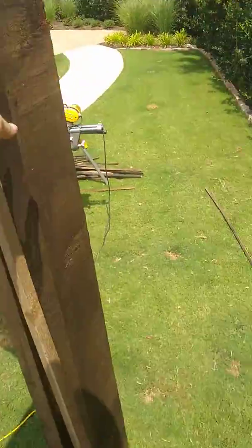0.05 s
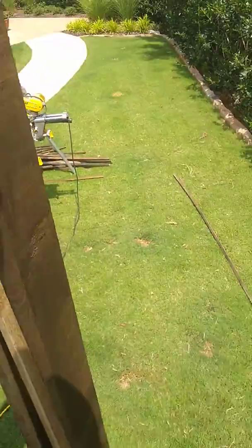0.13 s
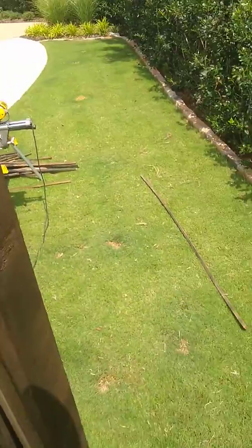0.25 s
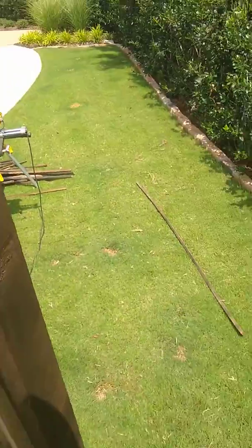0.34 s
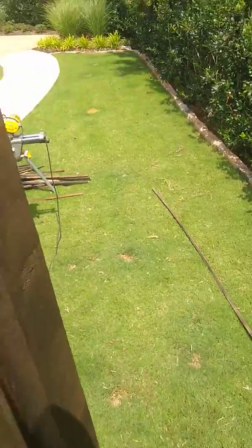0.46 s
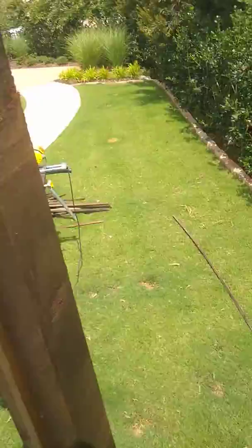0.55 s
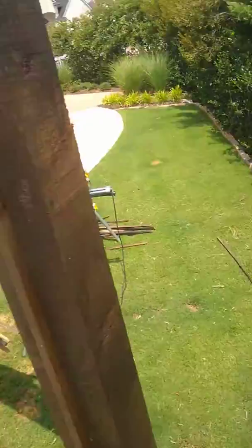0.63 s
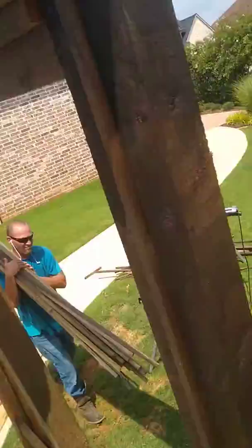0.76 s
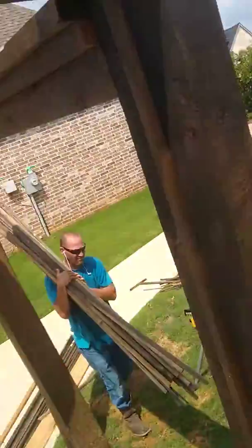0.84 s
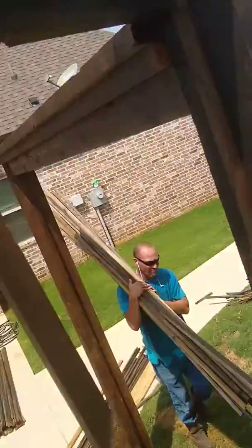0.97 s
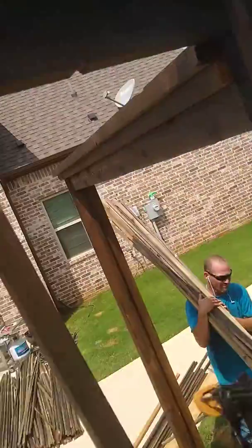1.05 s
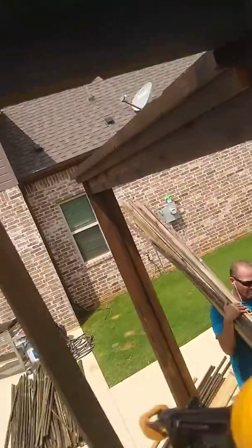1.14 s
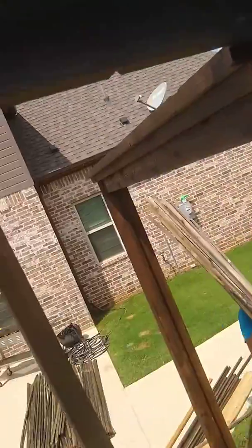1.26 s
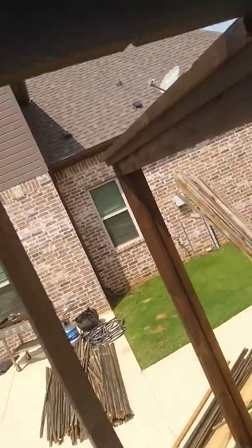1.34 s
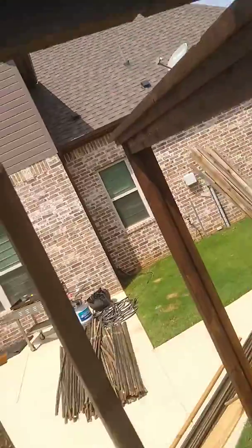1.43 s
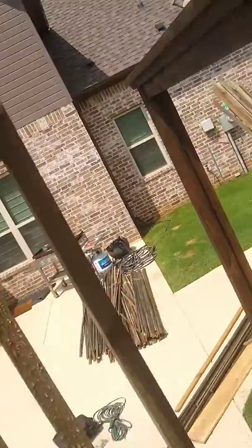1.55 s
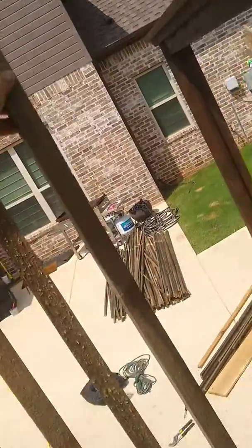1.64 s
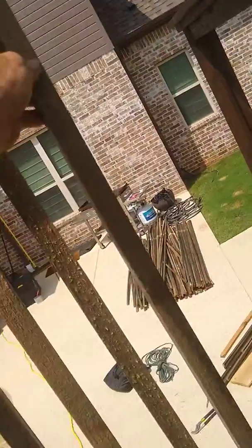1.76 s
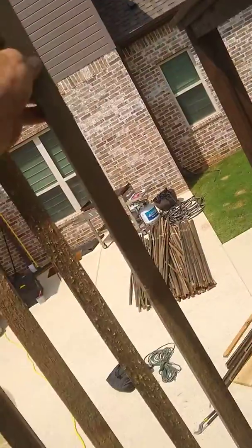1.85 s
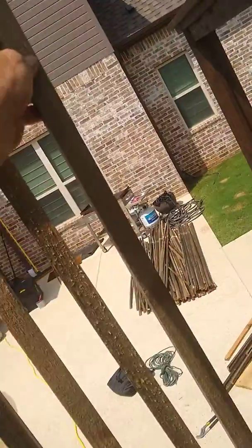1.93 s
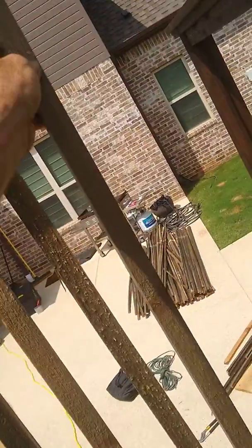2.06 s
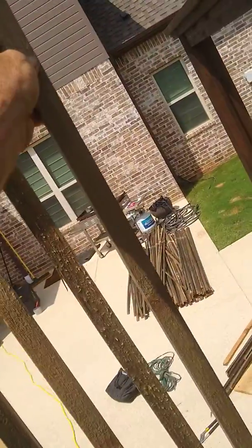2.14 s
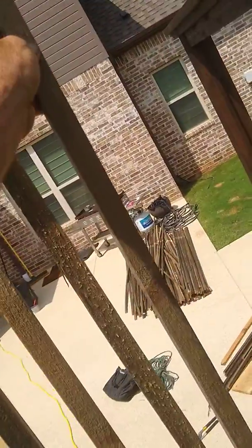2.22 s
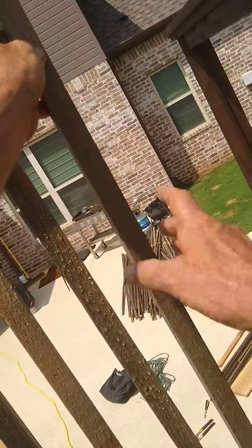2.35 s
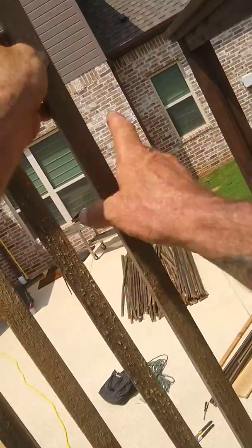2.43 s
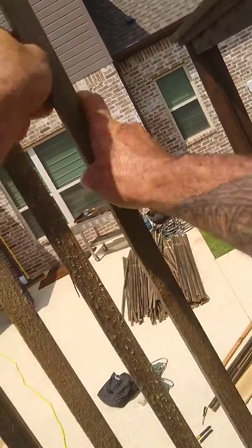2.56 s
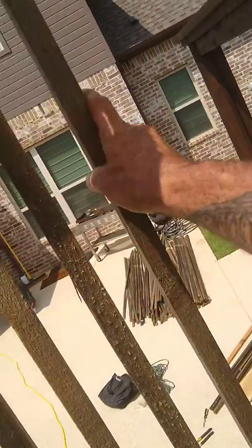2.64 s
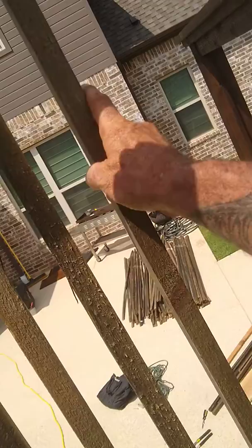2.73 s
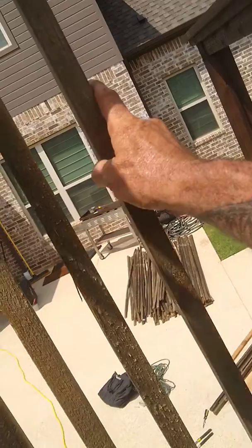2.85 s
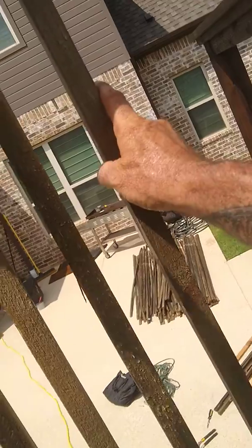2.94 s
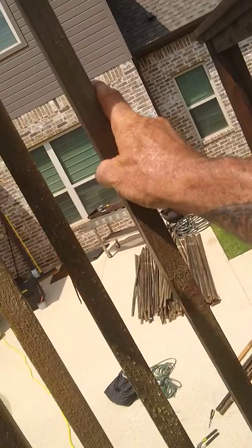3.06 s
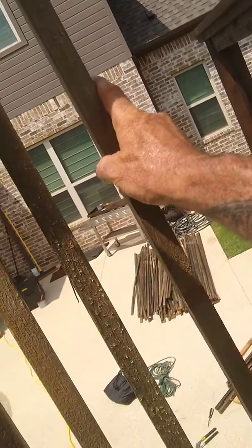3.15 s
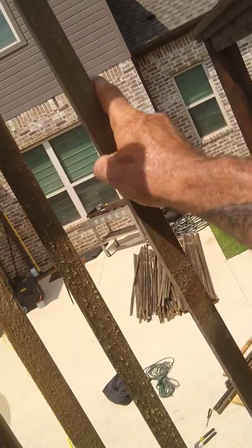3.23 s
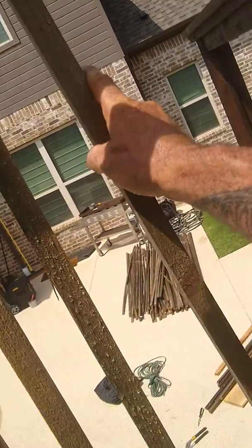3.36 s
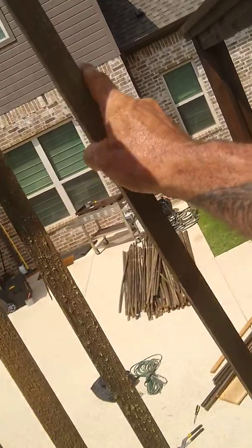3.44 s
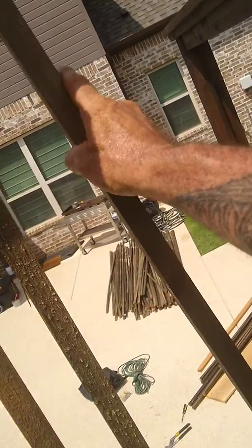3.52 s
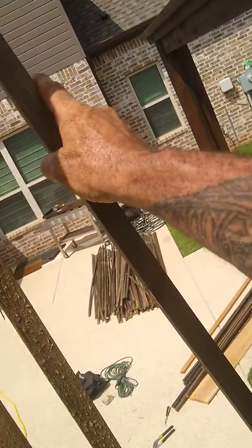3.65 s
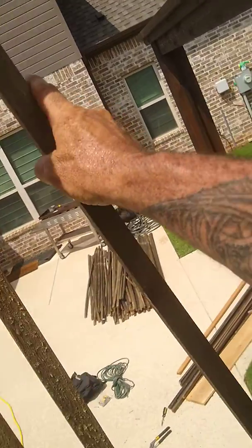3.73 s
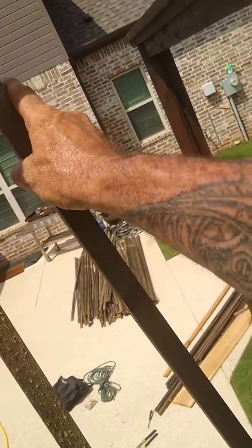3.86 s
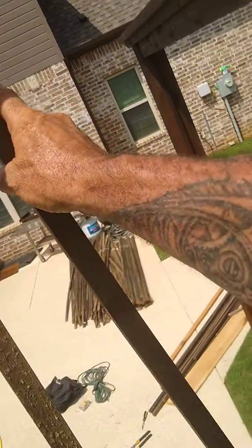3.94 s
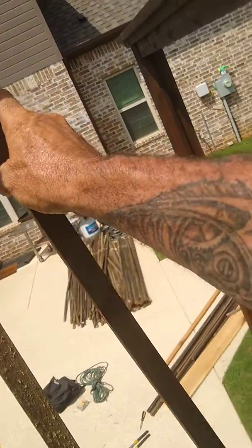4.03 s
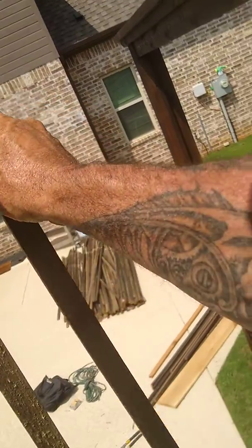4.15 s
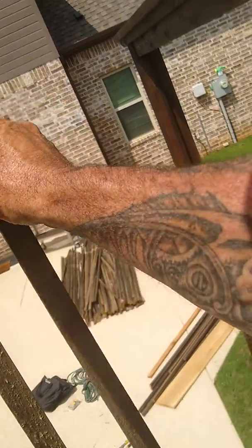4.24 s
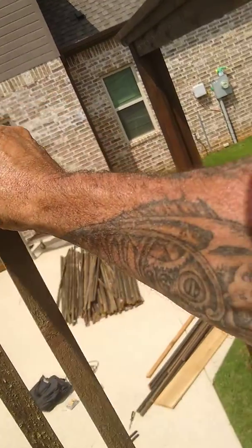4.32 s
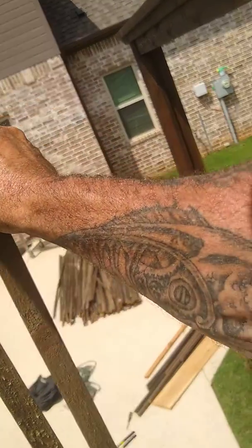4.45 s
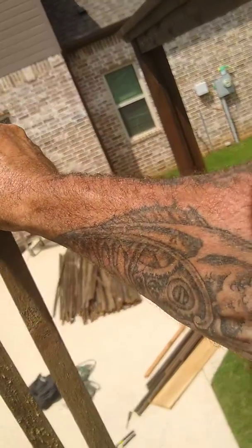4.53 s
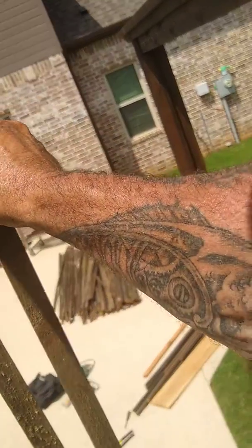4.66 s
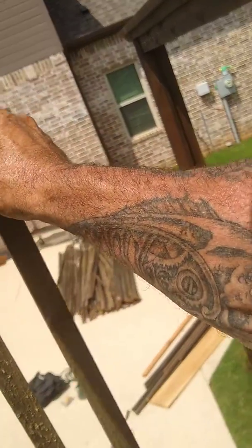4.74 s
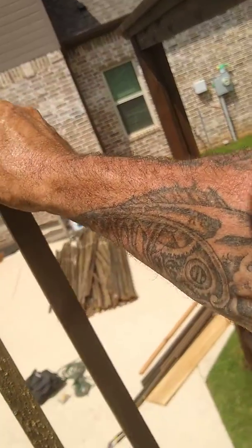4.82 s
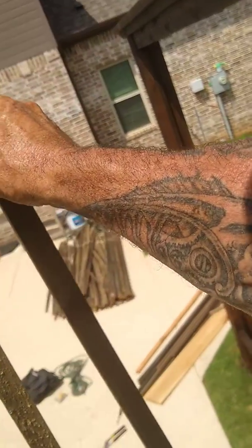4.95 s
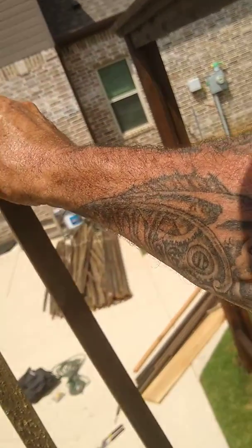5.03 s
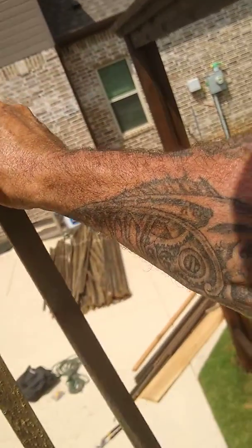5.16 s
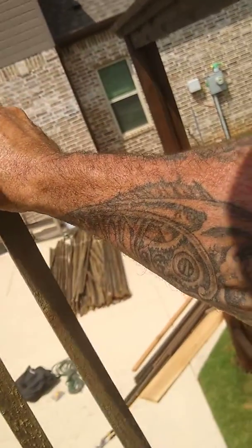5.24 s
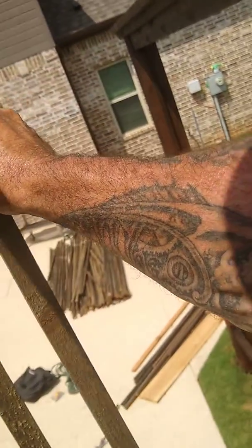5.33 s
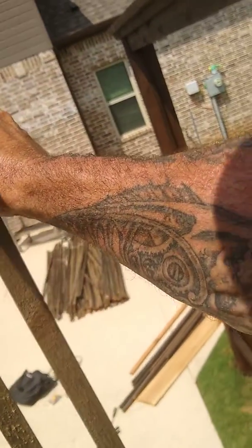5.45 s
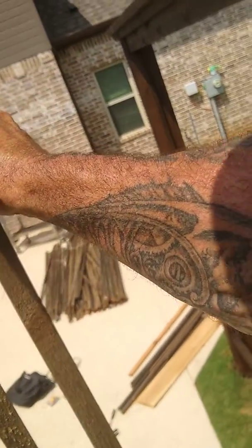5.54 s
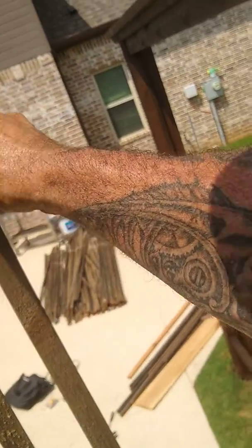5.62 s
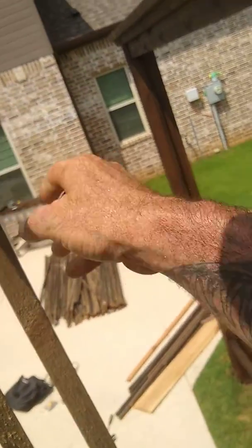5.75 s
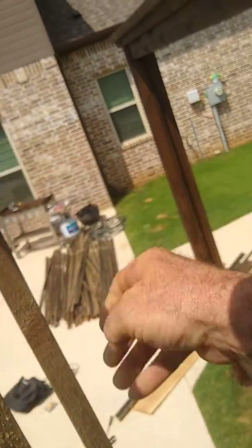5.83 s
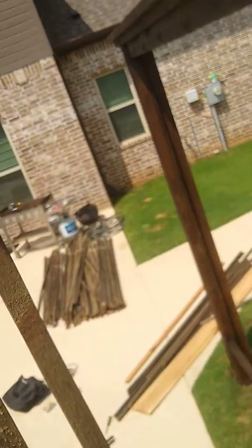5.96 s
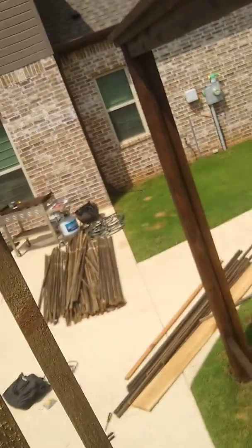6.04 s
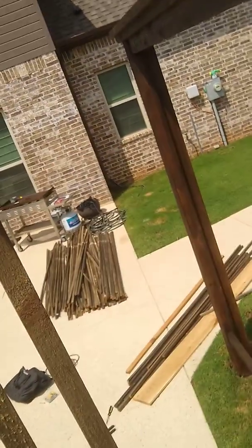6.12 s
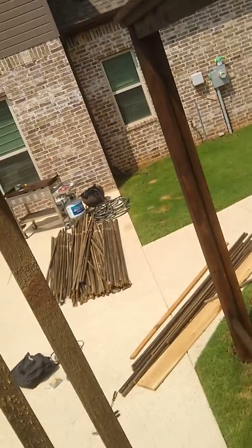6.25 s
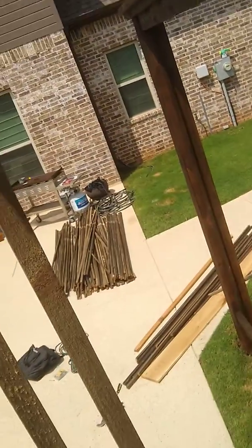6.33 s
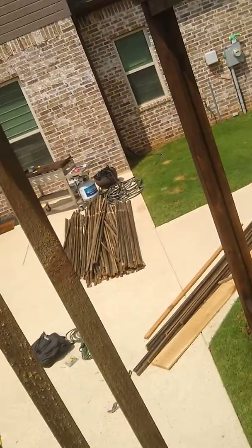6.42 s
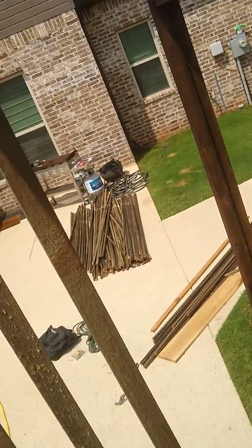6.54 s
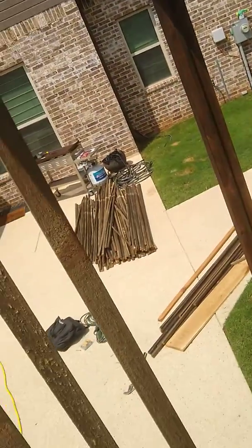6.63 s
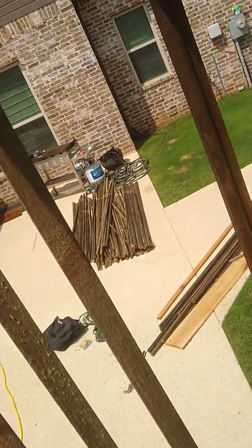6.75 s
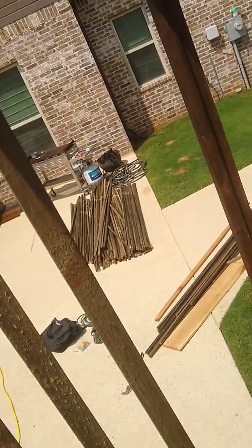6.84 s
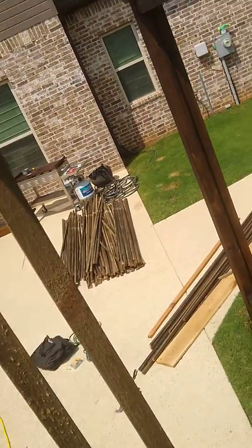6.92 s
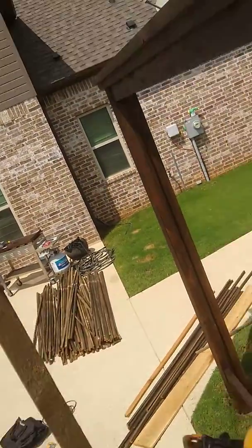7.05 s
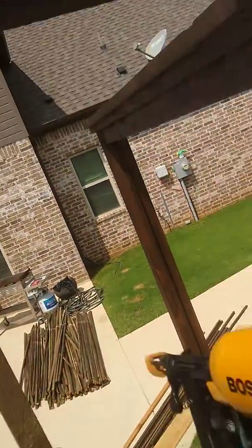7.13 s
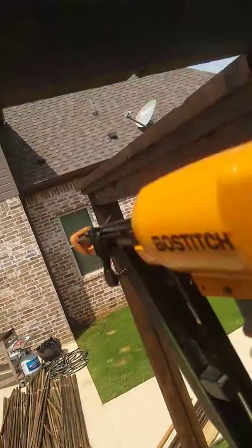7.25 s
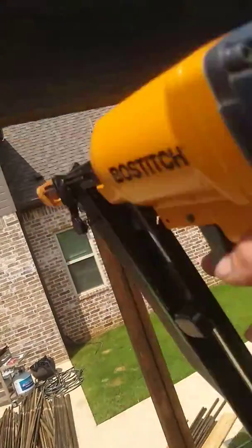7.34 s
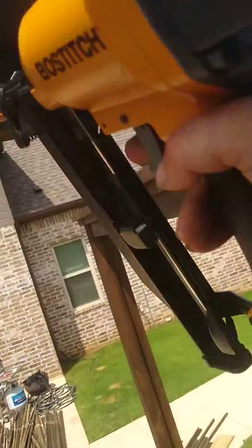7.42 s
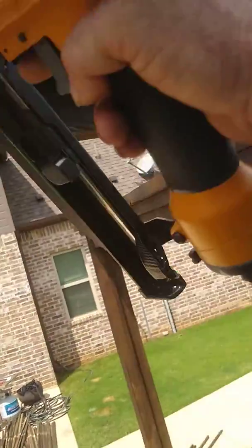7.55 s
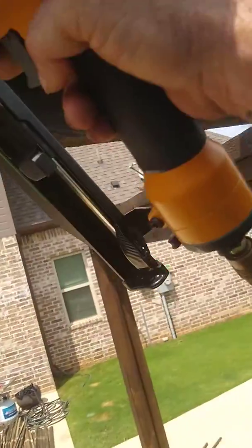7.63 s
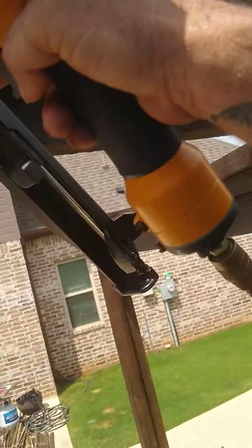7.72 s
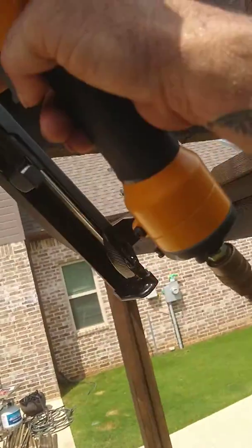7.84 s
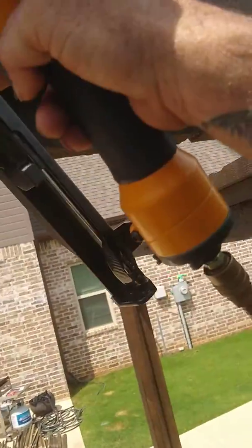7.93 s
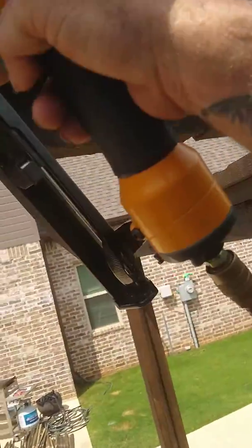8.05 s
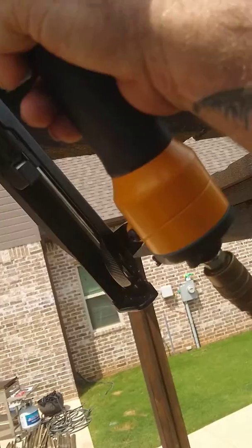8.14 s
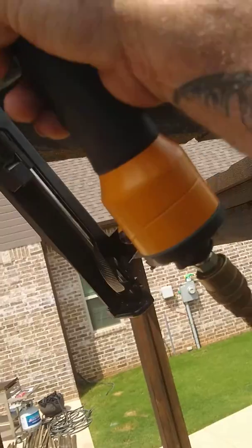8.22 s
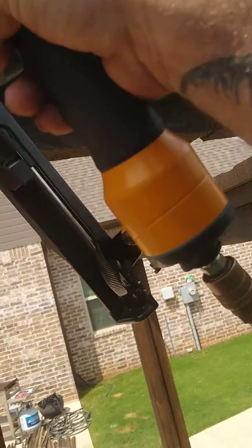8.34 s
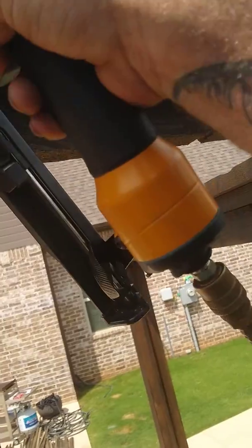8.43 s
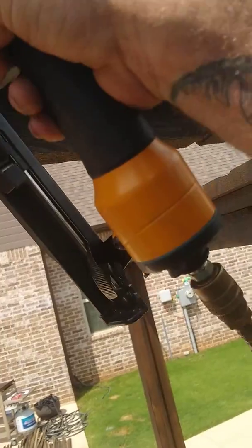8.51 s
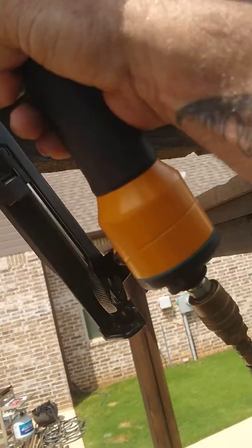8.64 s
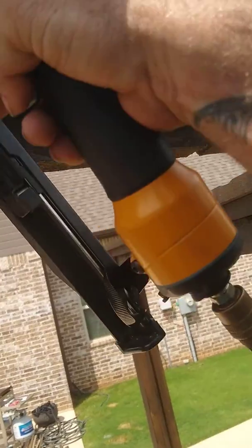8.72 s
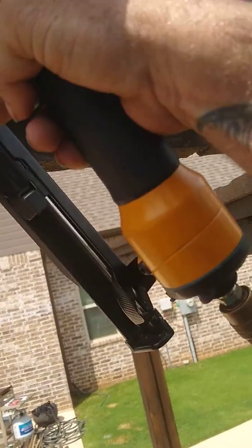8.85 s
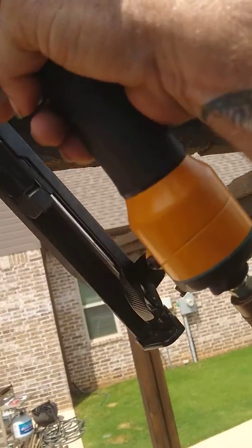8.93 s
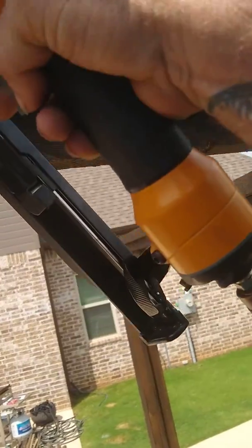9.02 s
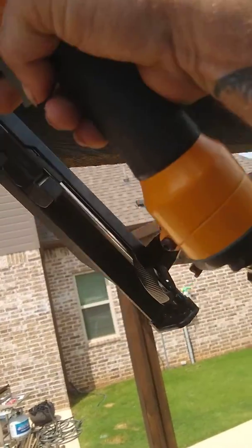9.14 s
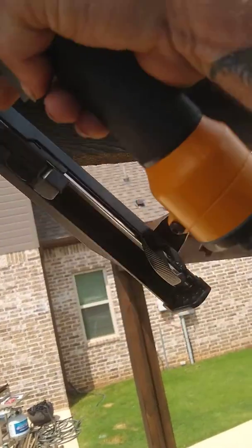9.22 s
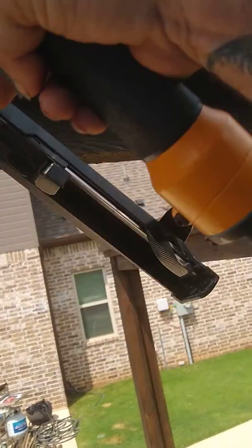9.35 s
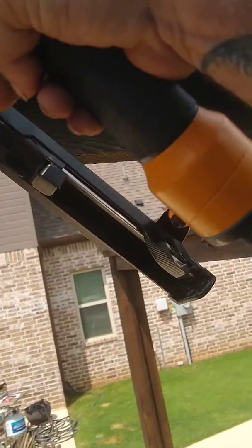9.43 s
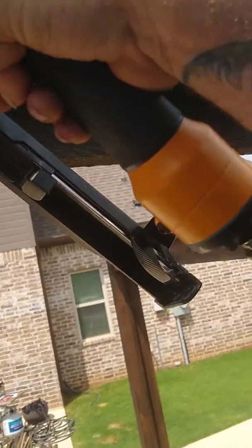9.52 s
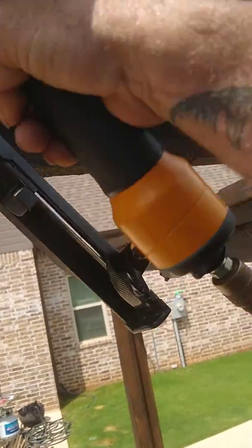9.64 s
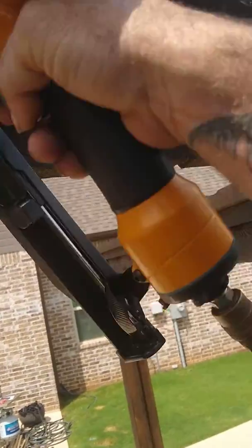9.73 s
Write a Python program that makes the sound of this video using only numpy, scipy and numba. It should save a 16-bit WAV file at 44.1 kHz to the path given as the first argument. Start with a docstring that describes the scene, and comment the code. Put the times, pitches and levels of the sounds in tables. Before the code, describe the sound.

A piston air compressor drones without pause in an open yard: a coarse buzz at about 48 strokes per second, with pulsing air noise and valve rattle. A handheld stereo recorder turns about, so the tone shifts from duller to brighter over the first 1.5 seconds and changes again around 7. Close wood sounds come in clusters: light scraping taps near 0.6, a strong dull thump at 1.06, taps at 1.5, a run at 2.0, more at 2.7, 3.6, 3.85, 5.05, 6.6 and 7.35-7.45, with a small one at 8.0. Low wind buffets swell around 2.2-3.3, strongest near 3.0. At 8.53 a nail gun fires very close: sharp crack, metallic ring, then an exhaust puff and clack near 8.7 and refill hiss. A second shot follows at 9.55, its return clack at 9.73. The drone ducks briefly after each blast.

```python
"""A piston air compressor drones in a yard, heard from a timber frame by a hand-held recorder that turns about.
Its drone is a stack of tones locked to the piston strokes, a second tone and noise pulsing with each stroke.
Low noise makes a light breeze with buffets, and knocks ring the timber as short sets of fading tones.
A pneumatic nail gun close by fires twice, with bursts of air, metal blows and ringing parts.
The recorder's gain control turns everything down when the sound gets too loud."""
import sys
import numpy as np
from scipy import signal
from scipy.fft import rfft, irfft
from scipy.io import wavfile
from scipy.ndimage import uniform_filter1d
from numba import njit

SR = 44100
rng = np.random.default_rng(int(sys.argv[2]) if len(sys.argv) > 2 else 0)


def generate_wav(sig):
    """Save sig (samples, or channels by samples) to the path in sys.argv[1] as 16-bit PCM at SR."""
    pcm = np.round(np.clip(np.atleast_2d(sig).T, -1, 1) * 32767).astype(np.int16)
    wavfile.write(sys.argv[1], SR, pcm)


N = 431298
T = np.arange(N) / SR   # time of each sample [s]
HZ = np.maximum(np.fft.rfftfreq(N, 1 / SR), 1)   # frequency of each spectrum bin [Hz]

# Compressor
# crank speed, sagging as the tank fills: (time [s], speed [strokes per s])
CRANK_SPEED = [(0, 47.785), (9.78, 47.57)]
# tones of the stroke: (multiple of the stroke rate [-])
STROKE_ORDERS = [1, 2, 3, 4, 5, 7, 8, 9, 10, 11, 12, 13, 14, 16, 17, 18, 19, 20, 21, 25, 26, 28, 33, 34, 35,
                 38, 39, 40, 27, 37, 43, 44, 49, 54, 55]
# their levels before the facing changes: (right port rms [dB], left port against right [dB])
STROKE_ORDER_LEVELS = [(-54, -5.5), (-41.5, -14), (-46, -11), (-69, 12.5), (-35, -45), (-34, -1.5),
                       (-32.5, -1), (-42, 1.5), (-38.5, -6), (-33, -21), (-44.5, -22), (-37.5, -32),
                       (-39.5, 1), (-58, 8.5), (-46.5, -24), (-53.5, 6.5), (-53.5, 3), (-45.5, 1),
                       (-51, 2.5), (-39.5, -4), (-54, -3), (-57, 9), (-47.5, -27), (-39.5, -11), (-54, -2),
                       (-51, 8), (-49.5, 4.5), (-35, -9.5), (-52.5, 0), (-51, 4), (-54, 5), (-59, 3.5),
                       (-74, 2), (-45, -11), (-52.5, -5)]
LAST_PULSE_ORDER = 14   # tones up to this one line up as the intake pulse
PULSE_SMEAR = 0.0199    # higher tones of the pulse lag [rad per order squared]
# the 20th tone, near 950 Hz, comes forward late: (time [s], added level [dB])
ORDER_20_SWELL = [(0, -8), (5.4, -28), (5.9, 1), (8.4, 0)]
# the recorder sways toward the pump: (time [s], distance gained [m])
SWAY_TOWARD_PUMP = [(0, -.18), (1.5, .12), (1.9, .13), (3.8, -.24), (4.4, -.24), (5.7, .24), (6.6, .18),
                    (7.0, -.02), (7.3, -.3), (8.4, -.5), (9.78, -.45)]
# turning shifts the left port's phase around 350 Hz: (time [s], phase [rad])
LEFT_PHASE_SWING = [(0, 0.022), (2, -0.68), (6.8, -0.37), (7.6, 0.8)]
# a second tone [Hz]; left and right rms before its swell [dB]; phases [rad]
HUM_HZ, HUM_DB, HUM_TURN = 279.4, [-46, -39.5], [0.91, 0]
# swell of that tone as the recorder turns: (time [s], added level [dB])
HUM_SWELL = [(0, -9), (1.5, -4.5), (7, -5), (7.6, 0.5)]
# colour of the pump's air and valve noise: (frequency [Hz], relative level per Hz [dB])
ROAR_COLOUR = [(45, -40), (100, -22), (200, -20), (320, -12.5), (430, -7), (550, 1.5), (800, -11),
               (1150, -10), (1600, -9.5), (2050, -10), (2400, -9.5), (2700, -9.5), (3200, -17.5),
               (4200, -20.5), (6000, -28), (8500, -36), (10200, -29.5), (11000, -20.5), (11600, -29.5),
               (15300, -24.5)]
ROAR_DB = -29.5   # before pulsing, rattle and facing

# How the recorder faces
# bands that change as it turns: (centre frequency [Hz])
FACING_HZ = [240, 350, 570, 900, 1200, 1620, 1920, 2700, 3500, 5500]
# its pose: (time [s], turned away from pump [-], lean [-], added level around 1200 Hz [dB])
HOLDING = [(0, 0.9, -1.3, -10), (.35, 0.9, -1.15, -14.5), (.7, 0.64, -0.37, -8.5), (1.05, 0.32, 0.44, -2.5),
           (1.4, 0.33, 0.48, -0.5), (1.75, 0.17, 0.39, -2), (2.45, 0.17, .73, -2), (2.8, 0.01, -0.49, 3),
           (3.5, 0.11, 0.064, 1.5), (4.2, 0.08, 0.26, -1), (5.6, 0.04, 0.29, 1), (5.95, 0.18, 0.51, 2.5),
           (6.65, 0.13, 0.8, 4.5), (7.0, 0.19, 0.22, 0.5), (7.35, 0.48, 0.084, 1.5),
           (7.7, 0.62, 0.42, -3.5), (8.05, 0.67, 0.19, 2.5), (9.3, 0.69, 0.36, 1.5)]
# each band above the lowest: (level facing the pump [dB], added when turned away [dB], added per lean [dB])
FACING_SHADING = [(-1.5, 5, 1.6), (4.5, -20.5, 0.2), (-0.5, 4.5, 5.5), (-1.5, 2, -3), (0, -5, 2.5),
                  (3, -9.5, 2), (0.1, -6, 0.8), (0.2, -4.5, 0.2), (-0.23, -5.5, 0.8)]
# extra for the left port around 350 and 570 Hz:
# (level facing the pump [dB], added when turned away [dB], added per lean [dB])
LEFT_SHADING = [(-0.5, -5.5, 0.5), (-6, 10, -4.5)]
# the bass: (time [s], added level around 240 Hz [dB])
BASS_LEVEL = [(0, -2), (1, -0.5), (2.2, 0.5), (2.7, 1.5), (3.5, 0.5), (7, 0.5), (9.3, -0.5)]
# the band around 1620 Hz also comes and goes by itself: (time [s], added level [dB])
UPPER_MID_LEVEL = [(0, 6), (.6, 3.5), (1.2, -5), (1.75, 2), (2.8, -0.5), (3.15, 2.5), (3.5, -2.5), (5.6, 0),
                   (5.95, 1), (6.65, 4), (7.0, 4), (7.35, -2.5), (8.4, 1.5)]
# two more bands: (time [s], added around 900 Hz [dB], added around 1920 Hz [dB])
MID_BAND_LEVELS = [(0, 7, 5.5), (.9, 3, -4), (1.8, 2, -2), (2.9, 2.5, -3.5), (4, 1.5, -5.5), (5.3, 2, -2.5),
                   (6, 2, -2), (6.6, 1.5, -5), (7.1, 2.5, -3), (7.25, 2.5, -7), (7.4, 2, -11),
                   (7.5, 0.5, 0), (8.4, -1, -0.5)]
# treble: (time [s], added around 2700 Hz [dB], added around 3500 Hz [dB], added in the top band [dB])
TREBLE_SWELL = [(0, -1.5, -0.5, -1), (.8, -0.5, 0, -1), (1.5, -1.5, 0, 0), (2.3, -0.5, 0.5, 0),
                (3.1, 0.5, 0, 1), (3.9, 1, 1, 0.5), (4.7, 1, 0, 1), (5.4, 1, 1, 1), (6.1, -0.5, -1.5, -0.5),
                (6.8, -0.5, 0.5, -0.5), (7.5, 1.5, -2, 0), (8.4, 0, 0, 1)]

# The two ports
# left port against right, before shading and crossfeed:
# (frequency [Hz], level [dB], phase [rad], likeness [0-1])
PORT_DIFFERENCE = [(50.5, -38, -2, 1), (148, 1.5, -2.1, 0.47), (188, 7.5, 0.56, 0.77), (348, -2, -3, 0.7),
                   (418, -2, -0.5, 0.2), (420, 2, -0.06, 0), (580, -4, 2.5, 0.07), (672, -4.5, 3, 0.2),
                   (767, -10, 0.5, 0.58), (1130, 0, 0, 1), (1500, -3, -.15, 1), (1900, -2, -.7, .9),
                   (2050, -1, -.15, .92), (2200, 0, 0, .92), (2800, -3.5, 0, 1), (3850, 0, 0, 1),
                   (8500, 0.5, 0, 1), (10500, 1, 1.1, 1), (11500, 0, 1.3, 1), (13500, -5, 1.4, .9),
                   (15450, -6, 0.8, 0.8)]
LEFT_LEAD_S = -20 / 44100   # negative: the left channel comes late (and inverted)
# each channel is fed into the other, late: likeness lost [0-1] and phase swing [rad], as a comb
CROSSFEED_UNLIKE, CROSSFEED_TURN = 0.3, 0.3

# Wind
# buffets on the ports: (time of the top [s], level at the top [dB], time to fall 25 dB [s])
BUFFETS = [(1.15, -46, .9), (2.15, -43, .12), (2.3, -40, 0.19), (2.7, -35, 0.16), (2.93, -50, .12),
           (3.02, -27, 0.095), (3.29, -31, 0.083), (4.57, -56, .08)]
BUFFET_RISE_S, BUFFET_RANGE_DB, BREEZE_DB = 0.092, 25, -63   # the rise climbs by the range

# Knocks
# blows on timber: (time [s], peak before the ports [dB], lowest mode struck [Hz],
# highest mode struck [Hz], 60 dB fade of a 900 Hz mode [s], pitch factor of the piece [-])
KNOCKS = [(0.554, -23, 1200, 3500, 0.03, 0.98), (0.574, -17, 900, 3500, 0.032, 1.1),
          (.5795, -19, 700, 1700, 0.025, 0.97), (0.584, -21, 900, 1700, 0.027, 1.1),
          (.594, -21, 700, 1200, .02, 0.87), (0.603, -22, 900, 3500, 0.03, 1.1),
          (.608, -24, 700, 1700, 0.038, .9), (1.06, -5, 640, 1300, 0.015, 0.94),
          (1.0619, -6.5, 140, 450, 0.016, 0.93), (1.069, -17, 140, 450, 0.046, 0.9),
          (1.094, -16, 140, 600, 0.04, 1.1), (1.117, -24, 140, 450, 0.036, .8),
          (1.4925, -16, 1200, 1700, 0.025, 1.01), (1.4985, -19, 700, 1700, 0.029, 0.97),
          (2.0248, -16, 900, 1300, 0.027, 1.08), (2.031, -14.5, 500, 700, .015, 0.98),
          (2.0375, -13, 900, 1300, 0.021, 1.1), (2.043, -12, 700, 1200, .03, .95),
          (2.051, -15, 700, 1500, 0.054, 1.04), (2.058, -16, 700, 1500, .07, 0.93),
          (2.709, -12.5, 500, 1700, 0.021, 1.2), (2.7095, -26, 2000, 3500, .015, 1.12),
          (2.718, -19, 900, 1700, .03, 1.1), (2.722, -15.5, 600, 1200, 0.03, .92),
          (2.734, -21, 600, 1200, .04, .9), (2.852, -20, 500, 1400, 0.013, 1.2),
          (3.638, -11, 500, 700, 0.018, 1.06), (3.651, -30, 500, 700, 0.023, 1.03),
          (3.845, -15.5, 600, 1200, 0.017, 0.88), (3.853, -15.5, 600, 1000, 0.04, 0.86),
          (5.041, -17, 700, 1200, 0.02, 0.82), (5.046, -17.5, 1200, 2700, 0.03, 1.06),
          (5.051, -16, 1200, 1700, .025, .93), (6.598, -16, 900, 2700, .03, 1.15),
          (6.828, -33, 1050, 1500, .03, 1.1), (7.343, -17, 800, 1300, 0.056, 1),
          (7.404, -23, 900, 1300, .025, 1.07), (7.435, -21, 1200, 1700, 0.021, 1.08),
          (7.438, -15, 900, 1200, 0.027, 0.97), (7.449, -18, 700, 1200, 0.045, .93),
          (7.998, -18, 1150, 1400, 0.03, 0.89)]
# ringing modes of posts and slats: (frequency [Hz], relative level [dB])
TIMBER_MODES = [(150, -9), (210, 7), (300, 9), (410, 16.5), (560, 7), (660, -2.5), (780, 6.5), (930, 4.5),
                (1080, 7.5), (1270, -28), (1430, 9), (1580, 1), (1900, -11), (2200, -1), (2550, 6),
                (3250, 7)]
KNOCK_SCUFF = .7   # depth of the roughness that sliding contact gives a ring
KNOCK_ATTACK_S, HARD_KNOCK_DB = .0015, -15   # knocks at or above this level land clean

# Nail gun
# shots: (trigger pulled [s], trigger let go [s], pull half level [dB], release half level [dB])
SHOTS = [(8.529, 8.653, 0, 0), (9.545, 9.6789, 0, 0)]
# air and body bursts: nose pressed, valve opens, drive:
# (time after pull [s], length [s], 60 dB fade [s], air level [dB], body level [dB])
PULL_BURSTS = [(0, 0.0017, 0.068, -8, -29), (.0222, 0.0017, 0.0093, -5, 2), (.0238, 0.007, 0.05, 5, 2.5)]
# air and body bursts: valve click, exhaust, piston return:
# (time after release [s], length [s], 60 dB fade [s], air level [dB], body level [dB])
RELEASE_BURSTS = [(-.0005, 0.0026, 0.02, -12, -12), (0.021, 0.049, 0.033, -11.5, -15),
                  (0.052, .007, .03, -9, -3.5)]
# blows of metal parts: (time after pull [s], peak of the push [dB], contact [ms])
PULL_BLOWS = [(.0003, -5, 1.6), (.0028, -7, 1.6), (.003, -8, 9.5), (.0222, -3, 1.4), (.0242, 7, 0.9),
              (.0262, 7, .8), (.0278, 11, 1.1), (.0338, 5, 1.1), (.0378, 3, 0.8)]
# blows of metal parts: (time after release [s], peak of the push [dB], contact [ms])
RELEASE_BLOWS = [(0.0007, -4, .8), (.0228, -12, 1.8), (.0497, 0, 3.6), (.0546, 4, 1.9), (.0571, 13, 1.2),
                 (.0600, 10, 1.0)]
# resonances of the gun's body: (frequency [Hz], width [Hz], relative level [dB])
GUN_BODY = [(490, 550, -2), (750, 610, 7), (1066, 760, 1.5), (2150, 210, 3), (2800, 1140, -5.5),
            (4460, 840, -7.5)]
# colour of the escaping air: (frequency [Hz], relative level per Hz [dB])
AIR_COLOUR = [(300, 9), (2000, 3), (5000, -4.5), (8300, -5.5), (11000, -4.5), (15000, 4)]
SEEP_DB, SEEP_AFTER_S = -28.5, 0.077   # air seeps from the drive until the refill
REFILL_DB, REFILL_AFTER_S, REFILL_RISE_S, REFILL_HOLD_S = -24.5, 0.044, 0.073, 0.098
REFILL_FADE_DB_PER_S = 60
# the driver blade sings after the drive
BLADE_HZ, BLADE_DB, BLADE_AFTER_S = 1740.5, -7.5, .036
BLADE_FADE_DB, BLADE_FADE_S = 100, 0.77   # steady fade: this many dB over this time
BLADE_CATCH_DB, BLADE_DECAY_DB_PER_S = 3.5, 30   # damped at the valve click; extra fade from the exhaust on
# the piston's landing leaves a short ring
RETURN_RING_HZ, RETURN_RING_DB, RETURN_RING_AFTER_S = 1150, 8, .059
RETURN_RING_FADE_DB, RETURN_RING_FADE_S = 1500, 0.95   # this many dB over this time
HISS_SHADED_HZ = 10000   # above this the left-right differences act more strongly on the gun

CUTOFF_HZ = 15500   # top of the recorder's range


def amp(db):
    """Decibels to gain."""
    return 10 ** (np.asarray(db) / 20)


def rms_one(x):
    """Scaled to rms 1."""
    return x / np.sqrt(np.mean(x ** 2) + 1e-20)


def in_time(rows):
    """Columns of a curve read at every sample."""
    s, *columns = np.transpose(rows)
    return np.array([np.interp(T, s, c) for c in columns])


def at_hz(rows, hz, axis=1):
    """One column of a table read on a log-frequency axis."""
    table = np.array(rows)
    return np.interp(np.log(hz), np.log(table[:, 0]), table[:, axis])


def drift(rate):
    """Slow random wander of rms 1: noise smoothed to about the given rate in Hz."""
    r = np.exp(-80 * np.pi * rate / SR)   # worked out at every 40th sample
    noise = rng.standard_normal(N // 40 + 2002)
    slow = signal.lfilter([1], [1, -2 * r, r * r], noise)[2000:]
    return np.interp(np.arange(N) / 40, np.arange(len(slow)), rms_one(slow))


def ramp(start, length):
    """Rises from 0 to 1."""
    return np.clip((T - start) / length, 0, 1)


def butter(x, hz, kind):
    """Second-order filter that keeps the highs or a band."""
    return signal.sosfilt(signal.butter(2, hz, kind, fs=SR, output="sos"), x)


def resonance(x, hz, width_hz):
    """A part that rings at one pitch: two-pole band with gain 1 on top."""
    r = np.exp(-np.pi * width_hz / SR)
    poles = [1, -2 * r * np.cos(2 * np.pi * hz / SR), r * r]
    return signal.lfilter([(1 - r * r) / 2, 0, (r * r - 1) / 2], poles, x)


def noise_pair(colour_table, envelope=1.0):
    """Two unrelated noise spectra of the given colour; rms 1 under a unit envelope."""
    colour = amp(at_hz(colour_table, HZ))
    return rfft(envelope * rng.standard_normal((2, N))) * rms_one(colour)


def port_turn(hz, shading):
    """Phase of the left port against the right; below 1 kHz it depends on where the source stands."""
    turn = at_hz(PORT_DIFFERENCE, hz, axis=2) * np.where(hz < 1000, shading, 1)
    turn = turn + CROSSFEED_TURN * np.sin(4 * np.pi * hz * LEFT_LEAD_S) * (hz > 1100)
    return np.pi - turn + 2 * np.pi * hz * LEFT_LEAD_S


def ports(right, other, shading):
    """Spectra at both ports: the left hears a late inverted copy mixed with an unrelated share."""
    alike = np.clip(at_hz(PORT_DIFFERENCE, HZ, axis=3), 0, 1)
    comb = (HZ > 1100) * np.sin(2 * np.pi * HZ * LEFT_LEAD_S) ** 2
    alike = alike * (1 - np.clip(CROSSFEED_UNLIKE, 0, 1) * comb)
    mixed = alike * right + np.sqrt(1 - alike ** 2) * other
    left = mixed * np.exp(1j * port_turn(HZ, shading))
    return np.array([left * amp(shading * at_hz(PORT_DIFFERENCE, HZ)), right])


def facing():
    """Turning and leaning the recorder changes the level of each band at both ports, in dB."""
    away, lean, mid_db = in_time(HOLDING)
    pose = np.array([np.ones(N), away, lean])
    out = np.zeros((len(FACING_HZ), 2, N))
    out[1:] = (np.array(FACING_SHADING) @ pose)[:, None]
    out[1:3, 0] += np.array(LEFT_SHADING) @ pose
    around_900_db, around_1920_db = in_time(MID_BAND_LEVELS)
    out[FACING_HZ.index(1200)] += mid_db
    out[FACING_HZ.index(1620)] += in_time(UPPER_MID_LEVEL)[0]
    out[FACING_HZ.index(900)] += around_900_db
    out[FACING_HZ.index(1920)] += around_1920_db
    out[0] += in_time(BASS_LEVEL)[0]
    out[-3:] += in_time(TREBLE_SWELL)[:, None]
    return out


def band_share(hz, k):
    """How far a frequency belongs to facing band k: 1 at its centre, 0 at the next centres."""
    place = np.interp(np.log(hz), np.log(FACING_HZ), np.arange(len(FACING_HZ)))
    return np.clip(1 - abs(place - k), 0, 1)


def stroke_tones(crank, facing_db):
    """The repeating piston stroke gives tones at whole multiples of the stroke rate."""
    out, stroke_hz = np.zeros((2, N)), np.mean(in_time(CRANK_SPEED))
    swing = in_time(LEFT_PHASE_SWING)[0]
    for order, (right_db, left_db) in zip(STROKE_ORDERS, STROKE_ORDER_LEVELS):
        hz = order * stroke_hz
        turned_db = sum(band_share(hz, k) * db for k, db in enumerate(facing_db) if band_share(hz, k) > 0)
        turned_db = turned_db + (order == 20) * in_time(ORDER_20_SWELL)[0]
        wander_db = 0.37 * np.sqrt(order) * drift(1.57)
        gain = np.sqrt(2) * amp(right_db + turned_db + wander_db)
        phase = order * crank - PULSE_SMEAR * order ** 2
        phase = phase + (order > LAST_PULSE_ORDER) * rng.uniform(0, 2 * np.pi)
        left_phase = phase + port_turn(hz, shading=1) + band_share(hz, 0.88) * swing
        out += gain * np.array([amp(left_db) * np.cos(left_phase), np.cos(phase)])
    return out


def hum():
    """A second tone that swells as the recorder turns, with a slightly wandering phase."""
    level = np.sqrt(2) * amp(HUM_DB)[:, None] * amp(in_time(HUM_SWELL)[0] + 0.24 * drift(0.75))
    phase = 2 * np.pi * HUM_HZ * T + 0.73 * drift(8.3)
    return level * np.cos(phase + np.array(HUM_TURN)[:, None])


def pump_roar(crank, facing_db):
    """Air noise swells with each stroke, and part of it is the same valve rattle every turn."""
    pulsing = amp(0.92 * np.cos(crank) + 0.5 * np.cos(2 * crank + 1.2))
    turn_share = crank / (2 * np.pi) % 1
    rattle = np.interp(turn_share, np.linspace(0, 1, 900), rng.standard_normal(900))
    rattle = butter(rattle, 1300, "high")
    right, other = noise_pair(ROAR_COLOUR, pulsing)
    coloured_rattle = rfft(rattle) * rms_one(amp(at_hz(ROAR_COLOUR, HZ)))
    roar = ports(right + 0.5 * coloured_rattle, other, shading=1.0)
    out = np.zeros((2, N))
    for k, level_db in enumerate(facing_db):
        gain = amp(ROAR_DB + level_db + 1.05 * drift(19.0))
        out += gain * irfft(roar * band_share(HZ, k), N)
    return out


def compressor():
    """The turning crank drives tones and roar, both coloured by how the recorder faces."""
    strokes = np.cumsum(in_time(CRANK_SPEED)[0]) / SR
    # coming nearer makes the sound arrive sooner, at 343 m/s
    sooner = in_time(SWAY_TOWARD_PUMP)[0] / 343 * np.mean(in_time(CRANK_SPEED))
    crank = 2 * np.pi * (strokes + sooner - .146)
    crank = crank + 0.0065 * drift(9.9)   # the crank runs a little unevenly
    facing_db = facing()
    return stroke_tones(crank, facing_db) + hum() + pump_roar(crank, facing_db)


def wind():
    """Lumpy low noise pushes the two ports mostly in opposite senses, in buffets over a breeze."""
    lumps = amp(2.5 * drift(8.0)) * rng.standard_normal((2, N))
    shared, own = rms_one(butter(lumps, [75, 190], "band"))
    level = amp(BREEZE_DB)
    for s, top_db, dying in BUFFETS:
        away_from_top = np.maximum((s - T) / BUFFET_RISE_S, (T - s) / dying)
        level = level + amp(top_db - BUFFET_RANGE_DB * away_from_top)
    return level * np.array([-1.2 * shared + .5 * own, shared])


def knocks():
    """Each knock rings the timber modes within its reach, higher ones fading faster."""
    out, t = np.zeros((2, N)), np.arange(int(.15 * SR)) / SR
    luck_db = rng.normal(0, 0.54, (len(KNOCKS), 2, len(TIMBER_MODES)))   # each blow's own mode strengths
    scuffs = signal.lfilter([1], [1, -1.8, .81], rng.standard_normal((len(KNOCKS), 2, len(t))))
    for (s, peak_db, low_hz, high_hz, t60, pitch), luck, scuff in zip(KNOCKS, luck_db, scuffs):
        ring = np.zeros((2, len(t)))
        for k, (hz, db) in enumerate(TIMBER_MODES):
            if low_hz <= hz <= high_hz:
                fade_db = 60 * t / t60 * np.sqrt(hz / 900)
                ring += amp(db + luck[:, [k]] - fade_db) * np.sin(2 * np.pi * pitch * hz * t)
        roughness = 1 + KNOCK_SCUFF * (peak_db < HARD_KNOCK_DB) * rms_one(scuff)
        ring = ring * (1 - np.exp(-t / KNOCK_ATTACK_S)) * roughness
        first = int(s * SR)
        out[:, first:first + len(t)] += amp(peak_db) * ring / abs(ring).max()
    left, right = ports(*rfft(out), shading=0.22)
    left = np.where((HZ > 120) & (HZ < 480), right, left)   # the low thud shakes both ports alike
    return irfft(np.array([left, right]), N)


def played(pull_rows, release_rows):
    """Rows of both halves placed at every shot: (time [s], half level [dB], rest of the row)."""
    placed = []
    for pull, release, pull_db, release_db in SHOTS:
        placed += [(pull + row[0], pull_db, *row[1:]) for row in pull_rows]
        placed += [(release + row[0], release_db, *row[1:]) for row in release_rows]
    return placed


def gun_bursts():
    """Envelopes of the air bursts and of the rattle they come with."""
    air, body = np.zeros((2, N))
    for s, db, length, t60, air_db, body_db in played(PULL_BURSTS, RELEASE_BURSTS):
        shape = ramp(s, 0.00053) * amp(db - 60 * np.clip(T - s - length, 0, .5) / t60)
        air += amp(air_db) * shape
        body += amp(body_db) * shape
    return air, body


def gun_metal(body):
    """Metal blows are single back-and-forth pushes; they and the rattle ring the gun's body."""
    pushes = np.zeros(N)
    for s, db, peak_db, contact_ms in played(PULL_BLOWS, RELEASE_BLOWS):
        pushes -= amp(db + peak_db) * np.sin(2 * np.pi * ramp(s, contact_ms / 1000))
    grains = rms_one(rng.standard_normal((2, N)) ** 3)   # a few hard contacts among many weak ones
    rattle = body * grains * amp(1.1 * drift(298)) + .5 * pushes
    solid = pushes
    for k, (hz, width, db) in enumerate(GUN_BODY):
        solid = solid + (-1) ** k * amp(db + 11.5) * resonance(rattle + 1e-18, hz, width)
    return solid


def blade_song(pull, release, pull_db):
    """The driver blade sings after the drive and is damped at the valve click."""
    start, exhaust = pull + BLADE_AFTER_S, release + RELEASE_BURSTS[1][0]
    damping_db = BLADE_FADE_DB * ramp(start, BLADE_FADE_S) + BLADE_CATCH_DB * ramp(release, .0033)
    damping_db = damping_db + BLADE_DECAY_DB_PER_S * ramp(exhaust, 1)
    return amp(pull_db + BLADE_DB - damping_db) * ramp(start, .003) * np.sin(2 * np.pi * BLADE_HZ * T)


def return_ring(release, release_db):
    """The piston's landing leaves a short ring."""
    landing = release + RETURN_RING_AFTER_S
    fade_db = RETURN_RING_FADE_DB * ramp(landing, RETURN_RING_FADE_S)
    level = amp(release_db + RETURN_RING_DB - fade_db) * ramp(landing, 0.0044)
    return level * np.sin(2 * np.pi * RETURN_RING_HZ * T)


def seep_and_refill(pull, release):
    """Envelope of air that seeps until the refill, then of the refill's hiss."""
    refill = release + REFILL_AFTER_S
    filling = ramp(refill, REFILL_RISE_S)
    seep = amp(SEEP_DB) * ramp(pull + SEEP_AFTER_S, 0.0091) * (1 - filling)
    fade_db = REFILL_FADE_DB_PER_S * ramp(refill + REFILL_RISE_S + REFILL_HOLD_S, 1)
    return seep + amp(REFILL_DB - fade_db) * filling


def gun():
    """Compressed air drives the nail: air is shaped noise, metal parts are pushes and rings."""
    air, body = gun_bursts()
    solid = gun_metal(body)
    for pull, release, pull_db, release_db in SHOTS:
        solid += blade_song(pull, release, pull_db) + return_ring(release, release_db)
        air += seep_and_refill(pull, release)
    shading = np.where(HZ > HISS_SHADED_HZ, 0.8, 0.087)
    return irfft(ports(*(noise_pair(AIR_COLOUR, air) + rfft(solid)), shading=shading), N)


def scene():
    """All sources at the two ports."""
    return compressor() + wind() + knocks() + gun()


@njit
def follow(over_db, attack, release):
    """Gain reduction that bites fast and lets go slowly."""
    out, state = np.zeros(len(over_db)), 0.0
    for i in range(len(over_db)):
        state += (attack if over_db[i] > state else release) * (over_db[i] - state)
        out[i] = state
    return out


def record(dry):
    """Gain control on both channels together, a bass cut, rounded peaks, then the top is cut."""
    power = uniform_filter1d(np.mean(dry ** 2, axis=0), size=440)
    level_db = 10 * np.log10(power + 1e-12)
    over_db = np.clip(level_db + 14.5, 0, 40)
    cut_db = follow(over_db, 1 / (0.0013 * SR), 1 / (.09 * SR))   # time constants in s
    late_cut_db = np.interp(T - .0025, T, cut_db)
    wet = np.tanh(butter(dry * amp(-late_cut_db), 60, "high"))
    return signal.sosfilt(signal.ellip(10, .5, 70, CUTOFF_HZ, fs=SR, output="sos"), wet)


dry = scene()
out = record(dry)
generate_wav(out)
```